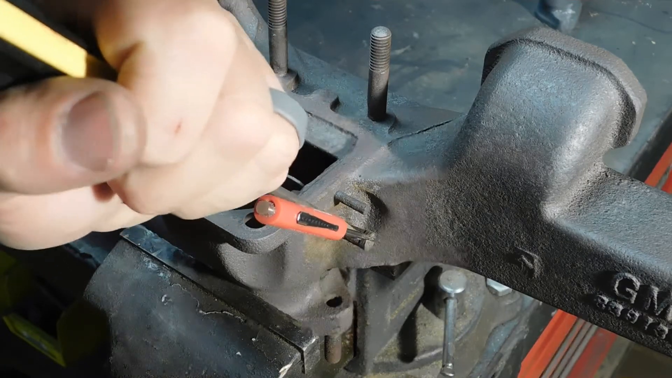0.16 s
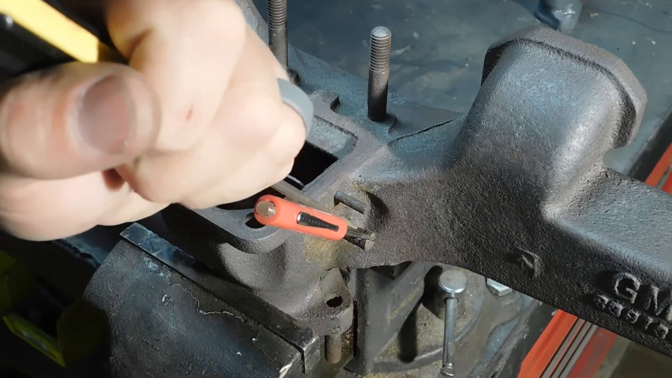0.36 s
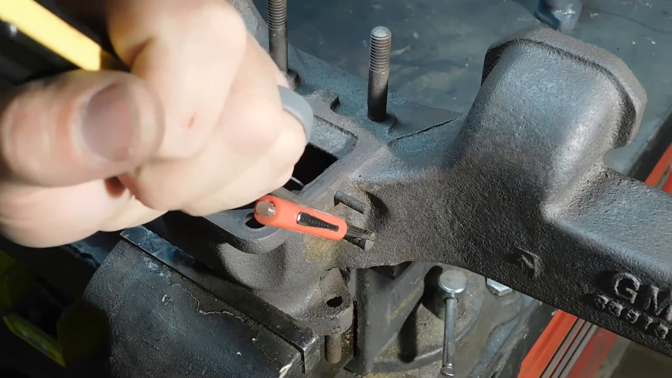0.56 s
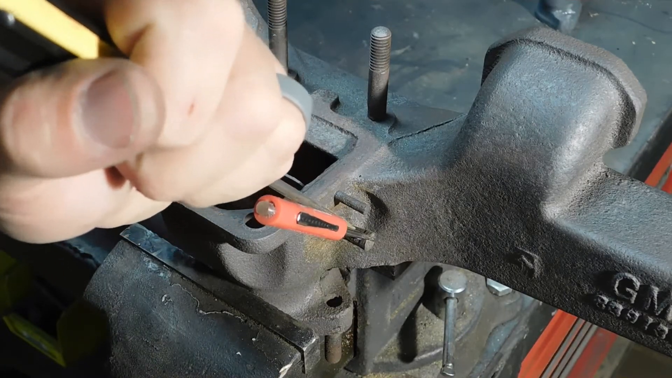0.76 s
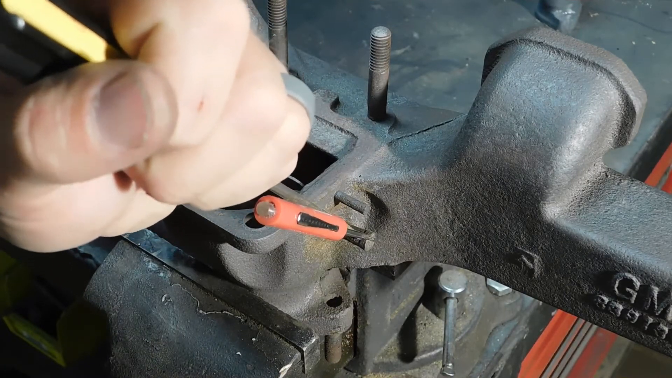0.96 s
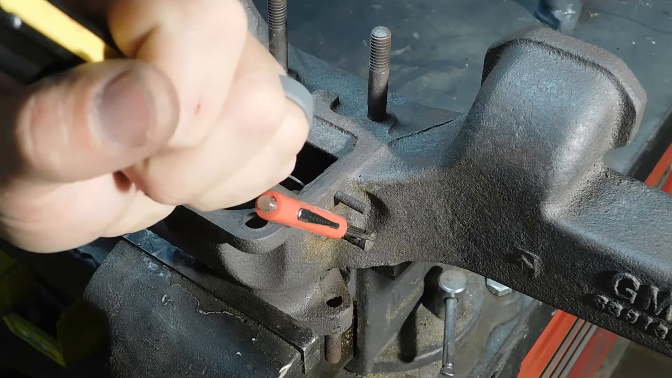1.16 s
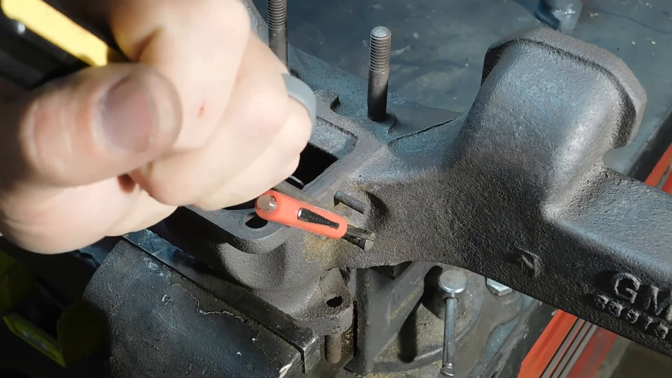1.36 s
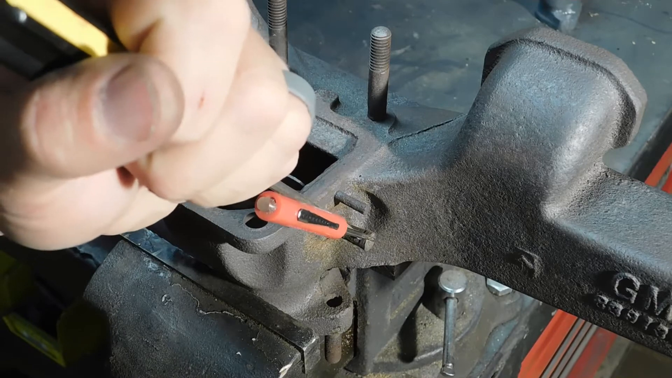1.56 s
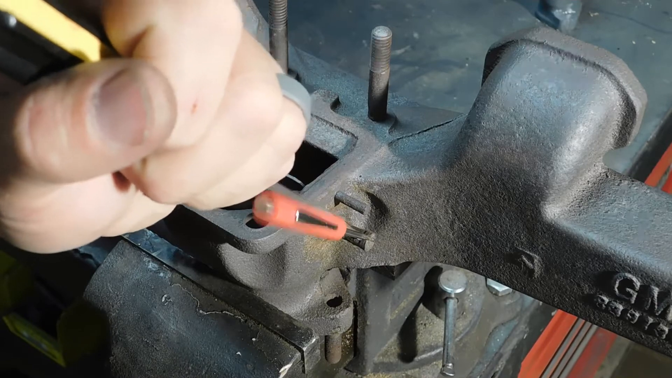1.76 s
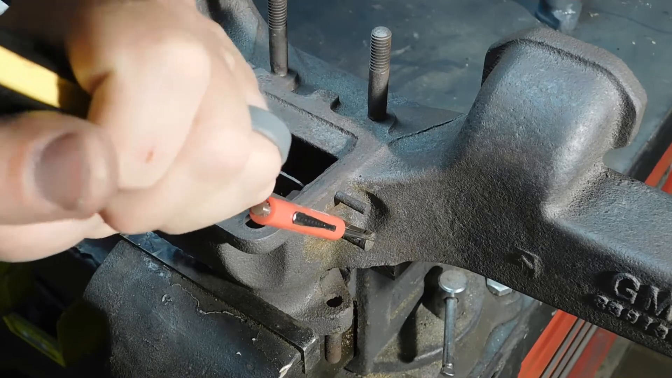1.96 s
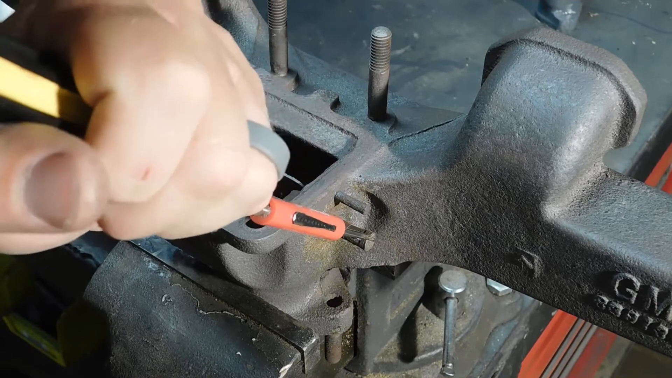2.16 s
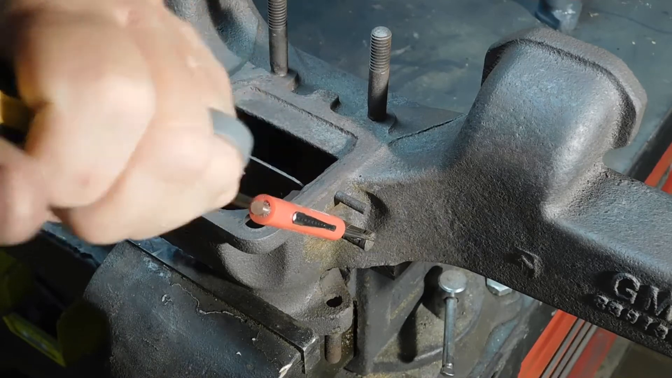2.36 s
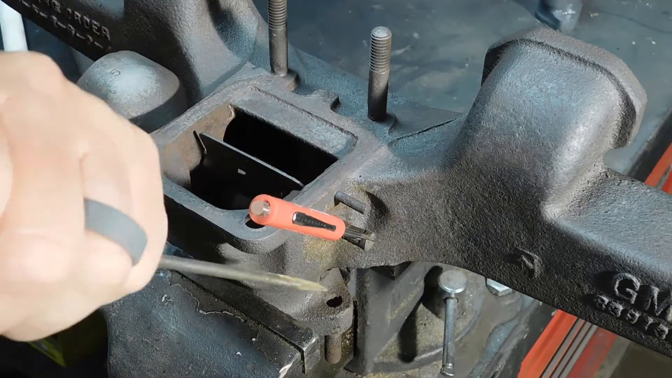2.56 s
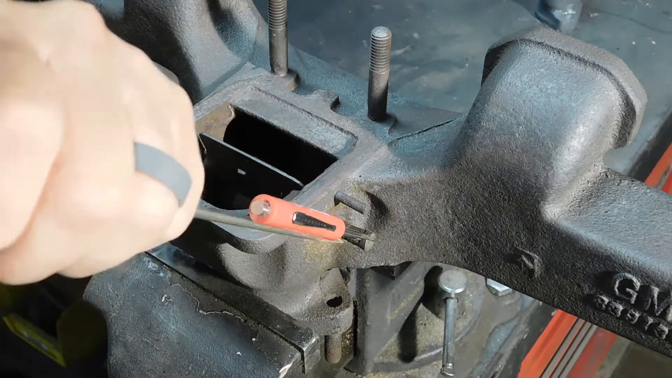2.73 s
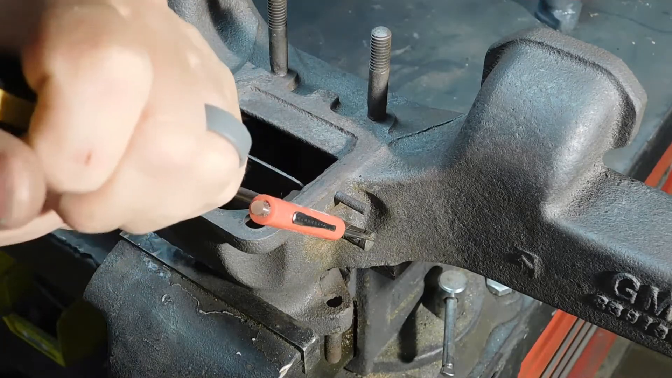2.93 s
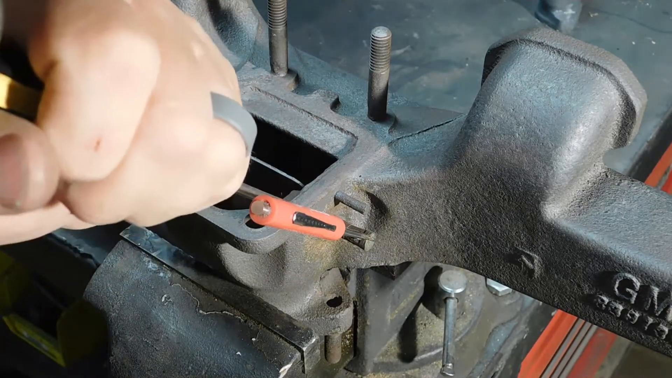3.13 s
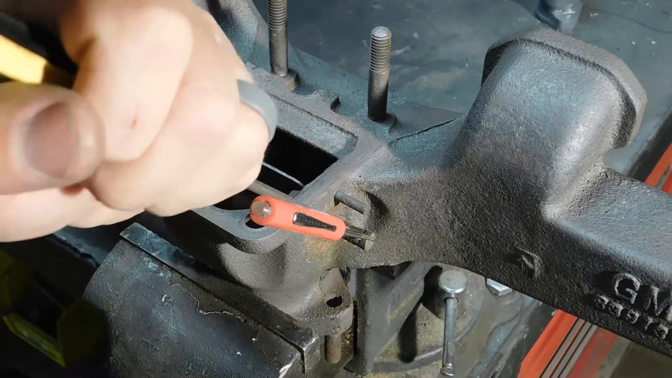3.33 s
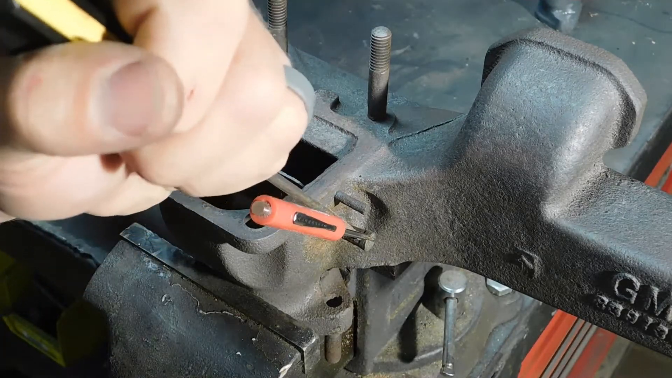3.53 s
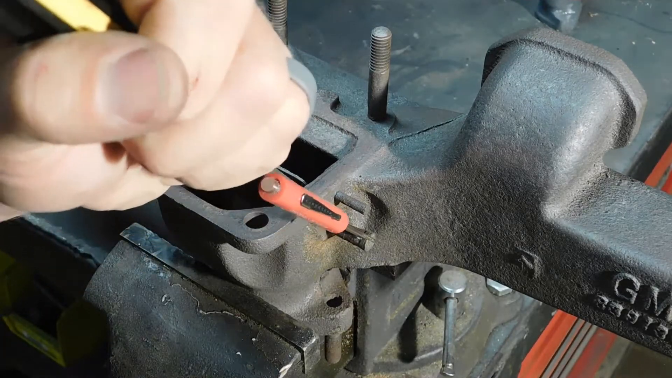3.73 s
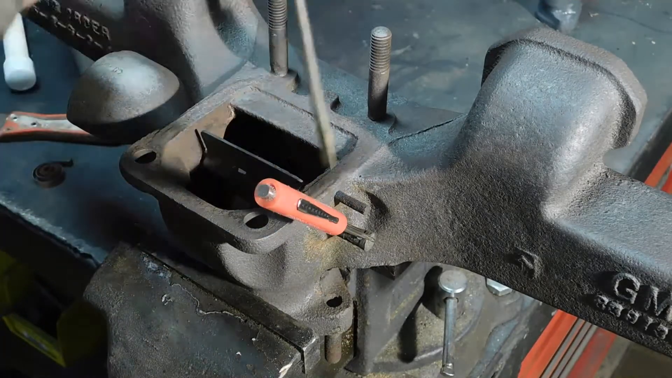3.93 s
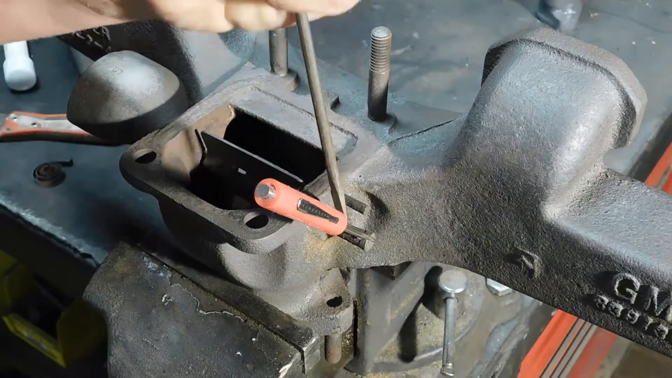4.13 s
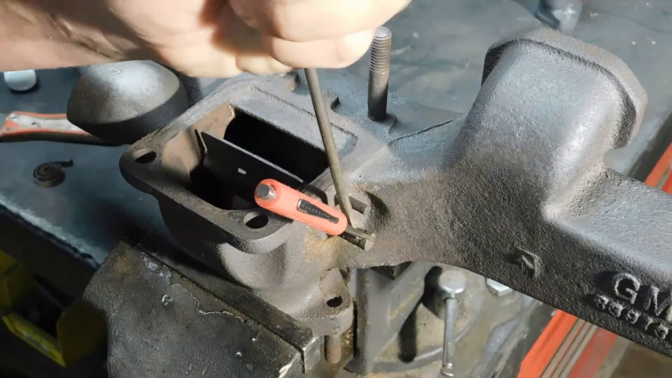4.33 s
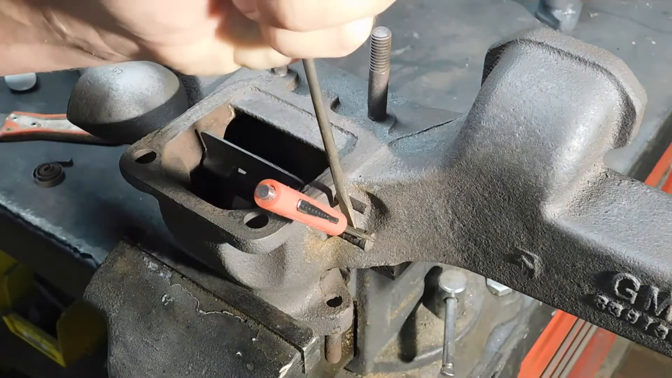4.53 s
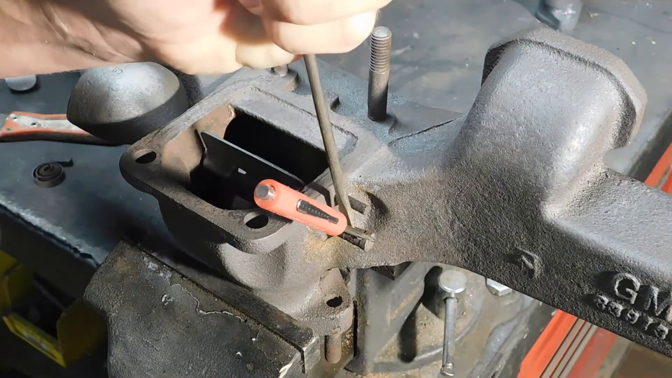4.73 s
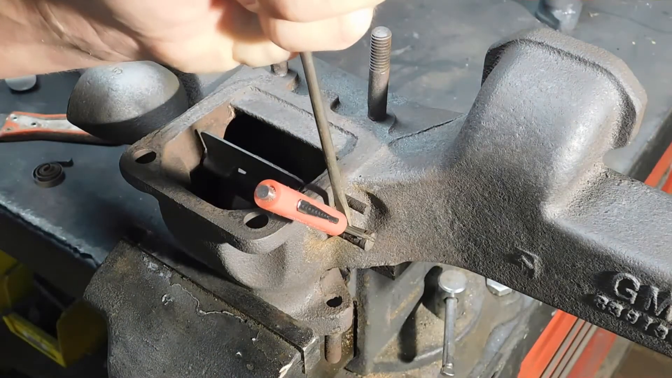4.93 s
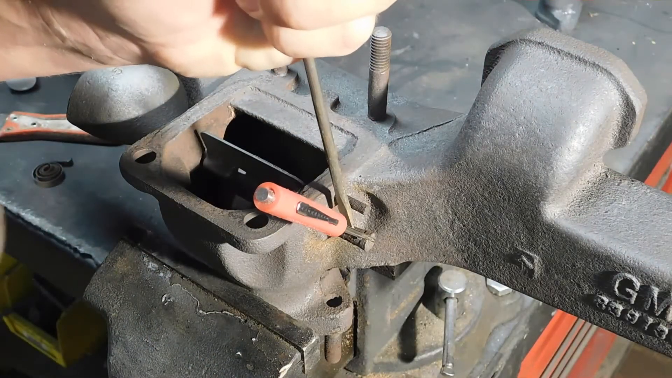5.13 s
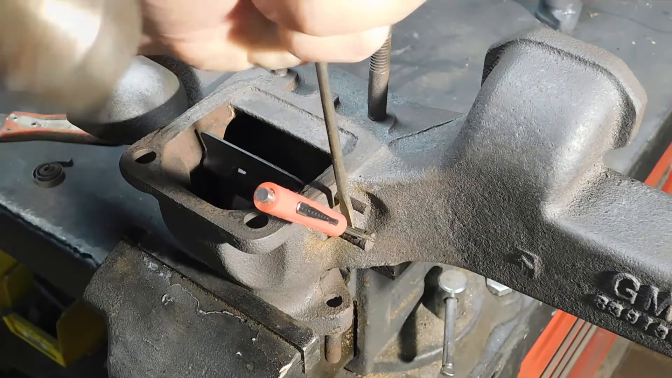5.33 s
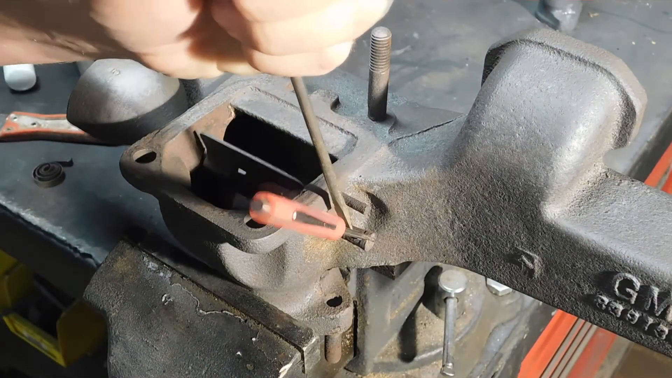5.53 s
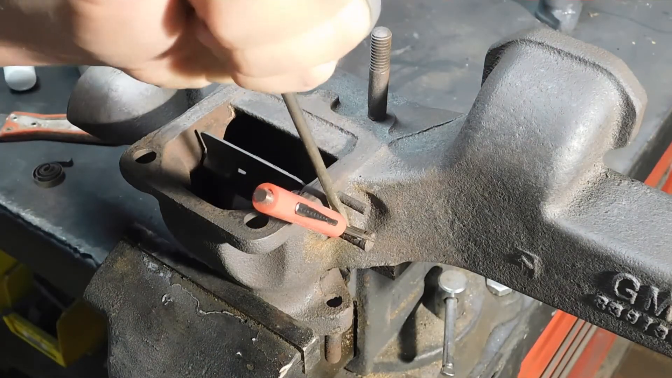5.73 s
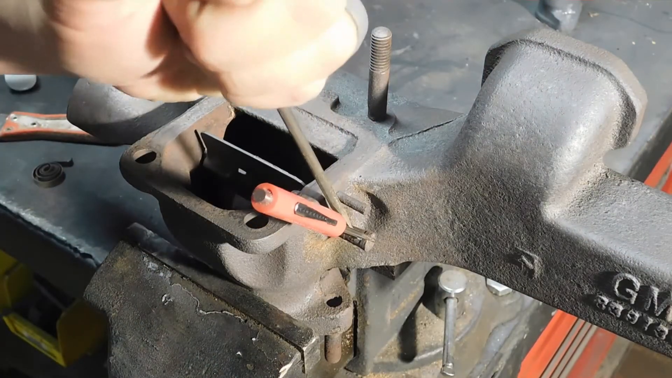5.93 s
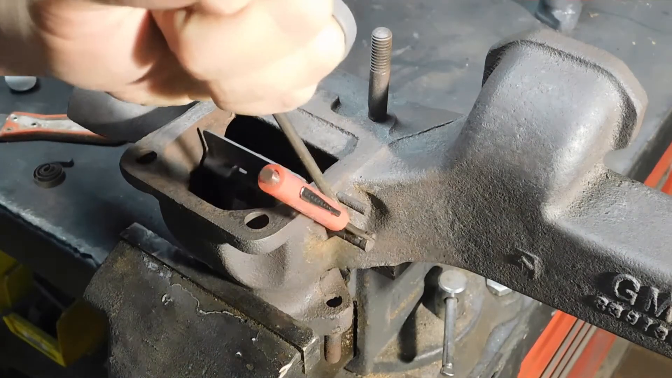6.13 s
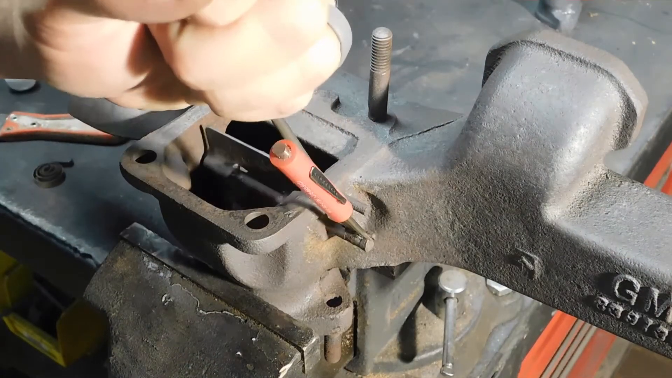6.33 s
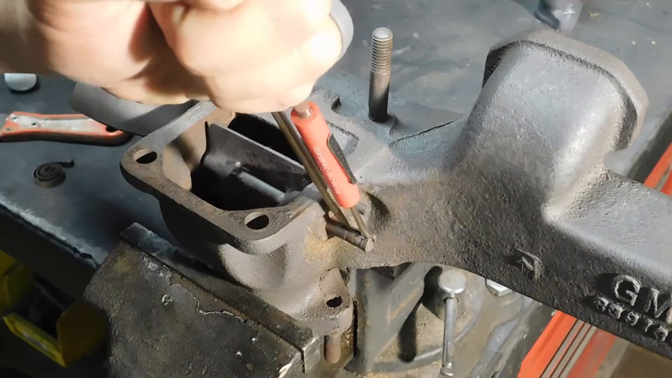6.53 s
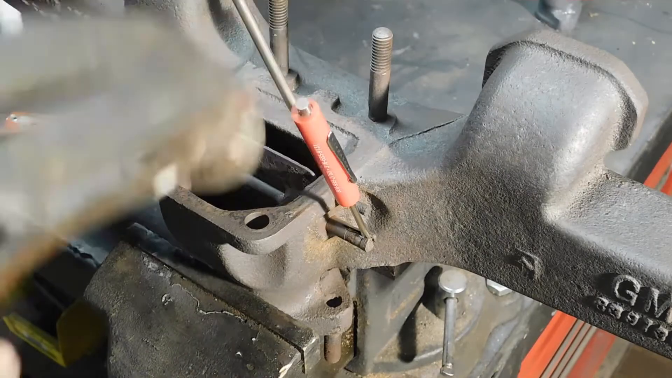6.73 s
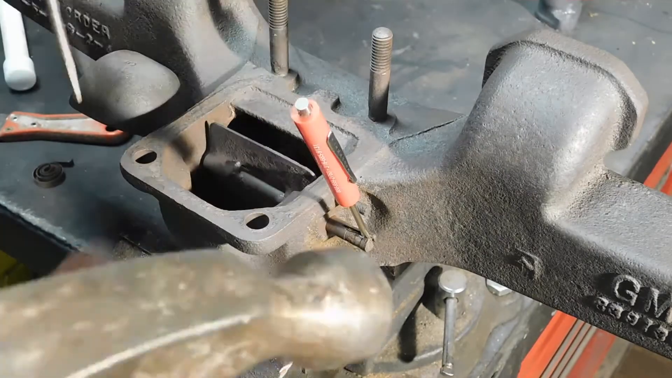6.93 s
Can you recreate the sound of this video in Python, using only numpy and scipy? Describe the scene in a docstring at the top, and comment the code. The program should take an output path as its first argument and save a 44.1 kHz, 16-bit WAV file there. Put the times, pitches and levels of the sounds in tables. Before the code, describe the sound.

Metal tapped and hammered in a hard-walled workshop: four spaced clanks, faint knocks between, then a rapid burst of clattering hits over faint hush.

```python
"""A ringing blow on iron comes first, over a steady hush, in a hard-walled workshop.
A screwdriver is tapped and levered against an iron casting in a vise. Small blade ticks and dull knocks
fall between the blows; a glove rustles at the end. Each strike is a burst of noise driving decaying
modes, broad clatter and a bench thud, answered by a room of decaying noise bands. The hush is coloured
noise with narrow-band tones. Two spaced microphones hear it with little in common."""
import sys
import numpy as np
from scipy import signal
from scipy.fft import rfft, irfft
from scipy.io import wavfile
from scipy.ndimage import uniform_filter1d

SR = 44100
rng = np.random.default_rng(int(sys.argv[2]) if len(sys.argv) > 2 else 0)


def generate_wav(sig):
    """Save sig (samples, or channels by samples) to the path in sys.argv[1] as 16-bit PCM at SR."""
    pcm = np.round(np.clip(np.atleast_2d(sig).T, -1, 1) * 32767).astype(np.int16)
    wavfile.write(sys.argv[1], SR, pcm)


N = 307818
SPAN = 2 ** 15  # samples worked out for each strike and for the room
HZ = np.maximum(np.arange(SPAN // 2 + 1) * SR / SPAN, 1)  # pitch of each spectrum bin


def from_db(db):
    """Decibels to gain."""
    return 10 ** (np.asarray(db) / 20)


def rms_one(x):
    """Scales to rms 1, both sides together."""
    return x / np.sqrt(np.mean(x ** 2) + 1e-20)


def peak_one(spectrum):
    """Scales each side so that its loudest 6 ms have rms 1."""
    power = uniform_filter1d(irfft(spectrum) ** 2, size=256)
    return spectrum / np.sqrt(np.max(power, axis=1, keepdims=True))


def in_time(rows):
    """A curve read at every sample."""
    return np.interp(np.arange(N) / SR, *np.transpose(rows))


def at_hz(points, hz):
    """A spectrum read on a log-frequency axis."""
    points_hz, values = np.transpose(points)
    return np.interp(np.log(hz), np.log(points_hz), values)


def coloured_noise(spectrum):
    """Noise shaped to a spectrum, unrelated on the two sides; rms 1."""
    hz = np.maximum(np.arange(N // 2 + 1) * SR / N, 1)
    white = rfft(rng.standard_normal((2, N)))
    return rms_one(irfft(white * from_db(at_hz(spectrum, hz)), N))


# spectrum of the air and machine noise: pitch_hz, relative density_db (per Hz)
HUSH_COLOUR = [(20, -21), (210, -19), (310, -16), (500, -9), (1000, -8), (1500, -7), (2000, -9),
               (2500, -12), (4000, -19), (5000, -24), (6500, -24), (9000, -30), (13000, -35), (16000, -37)]
# faint wavering tones: pitch_hz, width_hz, relative level_db
WAVERING_TONES = [(1250, 60, -5), (1454, 40, 0), (1745, 55, -1.5)]
# how the tones swell and sink: time_s, level_db
TONE_LEVEL = [(0, -71), (2.3, -74), (2.55, -63.5), (2.75, -71), (3.3, -70), (3.9, -57), (4.3, -78),
              (5.4, -62.5), (5.5, -67), (6.98, -75.5)]
HUSH_DB = -61


def hush():
    """Distant air and machine noise; narrow resonances turn noise into tones that waver."""
    tones = 0
    for hz, width_hz, db in WAVERING_TONES:
        radius = np.exp(-np.pi * width_hz / SR)
        poles = [1, -2 * radius * np.cos(2 * np.pi * hz / SR), radius * radius]
        tone = signal.lfilter([1, 0, -1], poles, rng.standard_normal((2, N)))
        tones = tones + from_db(db) * rms_one(tone)
    return from_db(HUSH_DB) * coloured_noise(HUSH_COLOUR) + from_db(in_time(TONE_LEVEL)) * tones


# glove on metal, rising at the end: time_s, level_db
RUSTLE_LEVEL = [(0, -94), (6.8, -81), (6.9, -70), (6.98, -51.5)]
# spectrum of the rustle: pitch_hz, relative density_db (per Hz)
RUSTLE_COLOUR = [(120, -50), (200, -18.5), (416, 3), (1160, -18.5), (1530, -12), (2130, -3), (16000, -12.5)]


def rustle():
    """A glove rubbing metal: coloured noise that swells at the end."""
    return from_db(in_time(RUSTLE_LEVEL)) * coloured_noise(RUSTLE_COLOUR)


# how fast the echoes die: pitch_hz, t60_s
ROOM_DECAY = [(60, 0.23), (200, .3), (500, 0.4), (1200, 0.38), (2500, .36), (5000, 0.32), (9000, 0.25),
              (12000, .22), (16000, .17)]
# how strongly each band starts: pitch_hz, relative level_db
ROOM_COLOUR = [(60, -25), (200, 0.5), (600, 4.5), (1300, 8), (2400, 0.5), (4000, 0), (9000, 3.5),
               (15000, -8.5)]
ROOM_BUILD_S = 0.015
HOLD_DB, HOLD_S = 4.5, 0.023  # the echoes hold louder for about this long, then drop


def workshop():
    """Echo spectrum for each side: third-octave noise bands that build up and die at their own rate."""
    t, echoes = np.arange(SPAN) / SR, np.zeros((2, SPAN))
    white = rfft(rng.standard_normal((2, SPAN)))
    for hz in 40 * 2 ** np.arange(0, 9, 1 / 3):
        band = np.clip(1 - 3 * np.abs(np.log2(HZ / hz)), 0, 1)
        fading_db = at_hz(ROOM_COLOUR, hz) - 60 * t / at_hz(ROOM_DECAY, hz)
        echoes += irfft(white * band) * from_db(fading_db)
    hold = from_db(HOLD_DB * np.exp(-(t / HOLD_S) ** 4))
    echoes *= (1 - np.exp(-t / ROOM_BUILD_S)) * (t < .6) * hold
    return rfft(echoes / np.sqrt(np.mean(np.sum(echoes ** 2, axis=1))))


def mode(hz, t60):
    """Frequency response of a sine of height 1 that dies away."""
    r = from_db(-60 / (t60 * SR))
    w = 2 * np.pi * hz / SR
    z = np.exp(-2j * np.pi * HZ / SR)
    return np.sin(w) * z / (1 - 2 * r * np.cos(w) * z + (r * z) ** 2)


MODE_SPREAD_DB = 2  # standard deviation of each mode's strength
THUD_HZ, THUD_T60_S = 145, 0.0035
FAVOUR_DB, FAVOUR_OCTAVES = 4.5, 0.37  # the spot struck favours one pitch in the direct sound
RING_FAVOUR_DB = 5  # modes near that pitch ring more strongly, in the room too
RIGHT_LATE_S = .0008


def nearness(hz, spot_hz):
    """1 at the favoured pitch, falling away over octaves."""
    return np.exp(-(np.log2(hz / spot_hz) / FAVOUR_OCTAVES) ** 2)


def strikes(events, touch, modes, clatter, room):
    """A gritty contact burst drives the modes, the clatter and the bench; the room answers."""
    t, out = np.arange(SPAN) / SR, np.zeros((2, N + SPAN))
    rise_share, bright_db, dulling, thud_db, pan_db = touch
    hardest_db, pitches = max(row[1] for row in events), np.array(modes)[:, 0]
    rings = np.array([from_db(db) * mode(hz, t60) for hz, db, t60 in modes])
    bins = [round(hz * SPAN / SR) for hz in pitches]
    thud = mode(THUD_HZ, THUD_T60_S)
    octaves = np.log2(np.maximum(HZ, 500) / 2000)
    clatter_gain = from_db(at_hz(clatter, HZ))
    sides = from_db(pan_db / 2 * np.array([[1], [-1]]))
    for start_s, level_db, contact_ms, ring_db, room_db, spot_hz in events:
        age = 1000 * t / contact_ms
        shape = (1 - np.exp(-age / rise_share)) ** 2 * np.exp(-age)
        grit = rfft(rng.standard_normal((2, SPAN)) * shape) / np.sqrt(np.sum(shape ** 2))
        # each side faces the body from another angle, so the modes arrive with other strengths
        spread_db = MODE_SPREAD_DB * rng.standard_normal((2, len(modes)))
        strength = from_db(ring_db + RING_FAVOUR_DB * nearness(pitches, spot_hz) + spread_db)
        # even out how strongly the random burst happens to drive each mode
        strength /= np.maximum(np.abs(grit[:, bins]), .4)
        brightness = from_db((bright_db - dulling * (hardest_db - level_db)) * octaves)
        body = peak_one(grit * brightness * (strength @ rings + clatter_gain))
        body += from_db(thud_db) * peak_one(grit * thud)
        favoured = from_db(FAVOUR_DB * nearness(HZ, spot_hz))
        heard = body * (favoured + from_db(room_db) * room)
        heard[1] *= np.exp(-2j * np.pi * HZ * RIGHT_LATE_S)
        at = int(start_s * SR)
        out[:, at:at + SPAN] += from_db(level_db) * sides * irfft(heard) * (t < .7)
    return out[:, :N]


# ticks of the blade: start_s, level_db, contact_ms, ring_db, room_share_db, favoured_hz
BLADE_TICKS = [(3.002, -50.5, 0.76, -13, -9, 5530), (3.129, -59, 1.47, -9, -21, 3510),
               (4.540, -44.5, 3.1, 8.5, -9.5, 2200), (4.767, -56.5, 6.9, 2, -8, 8300),
               (5.017, -45.5, 6.7, 6.5, -17, 2200), (5.084, -44.5, 1, 5, -6, 2220),
               (5.118, -47, 4.5, -15, -17, 9200), (5.460, -39.5, 0.2, -14, -18, 7000)]
# shared touch: rise (share of contact), brightness (dB per octave, hardest strike),
# brightness lost (dB per octave for each dB below the hardest), thud_db, left_over_right_db
TICK_TOUCH = (0.1, 1, -0.03, -55, 1.5)
# modes of the blade: pitch_hz, relative level_db, t60_s
BLADE_MODES = [(2100, -5, .07), (2600, -11, .03), (3300, -8, .04), (6200, -21, .02), (8300, -18, .03),
               (9300, -22, .025)]
# clatter of the blade: pitch_hz, relative level_db
BLADE_CLATTER = [(30, -10), (1200, -17), (2000, 42), (4000, 33.5), (8000, 19), (16000, 17)]


def blade_ticks(room):
    """Small ticks: contact bursts ring the short modes of the screwdriver blade."""
    return strikes(BLADE_TICKS, TICK_TOUCH, BLADE_MODES, BLADE_CLATTER, room)


# dull knocks on the vise: start_s, level_db, contact_ms, ring_db, room_share_db, favoured_hz
VISE_KNOCKS = [(0.268, -63, 6.3, 4.5, -19, 497), (0.506, -47.5, 9.5, 2, -5.5, 1220),
               (0.689, -42, 17, 1.5, -10.5, 1430), (0.886, -49, 17, 6, -12, 990),
               (0.912, -54, 6.3, -8.5, -12.5, 2000), (1.408, -44, 6.5, -6.5, -11, 1490),
               (1.682, -30, 9.6, 9, -7.5, 1210), (3.008, -54.5, 8.6, 3, -7, 502),
               (3.516, -27.5, 6.4, 5.5, -10.5, 2444), (4.326, -53, 8.5, 2, -4, 1000),
               (4.833, -49, 8.4, 0, -10.5, 968), (5.125, -47.5, 6, 6.5, -7, 690)]
# shared touch, columns as for the ticks
KNOCK_TOUCH = (0.12, 4.5, .25, -40.5, -0.1)
# modes of the vise: pitch_hz, relative level_db, t60_s
VISE_MODES = [(480, -6, .08), (640, -3, .1), (965, -4, .1), (1085, -1, .1), (1420, -6, .07), (1770, 1, .08),
              (2050, -7, .07), (2466, -5, .06), (3240, -11, .05)]
# clatter of the vise: pitch_hz, relative level_db
VISE_CLATTER = [(200, 5), (450, 6.7), (1000, 45), (2000, 48), (3400, 39.5), (5000, 27.8), (9000, 19),
                (16000, 8.5)]


def vise_knocks(room):
    """Dull knocks: contact bursts drive the lower modes of the vise."""
    return strikes(VISE_KNOCKS, KNOCK_TOUCH, VISE_MODES, VISE_CLATTER, room)


# blows on the casting: start_s, level_db, contact_ms, ring_db, room_share_db, favoured_hz
CASTING_BLOWS = [(0.055, -8.5, 4.7, -3, -5.5, 2140), (1.136, -9.5, 6.5, -0.5, -6.5, 2120),
                 (1.813, -8.5, 7.1, -3.5, -3.5, 2180), (3.683, -8, 3.8, 0, -6.5, 3060),
                 (5.589, -20.5, 8.5, -1, 4, 680), (5.733, -5.5, 3.8, -1.5, -6, 2200),
                 (5.879, -14, 9, -4, -0.95, 1100), (6.008, -16, 18.5, -10, 1.3, 1220),
                 (6.137, -11.5, 14.3, -14, -1.1, 3250), (6.277, -11.5, 6.9, -10.5, 1.8, 2170),
                 (6.427, -17.5, 27, -11.5, -0.5, 1440), (6.560, -10.5, 12.4, -13.5, -2.5, 2450)]
# shared touch, columns as for the ticks
BLOW_TOUCH = (0.0237, 1.61, 0.0775, -17, .1)
# modes of the casting: pitch_hz, relative level_db, t60_s
CASTING_MODES = [(607, -5, .14), (960, -8, .1), (1077, -5, .14), (1410, -8, .07), (1740, -8, .07),
                 (2052, 2, .14), (2392, -4, .1), (2640, -6, .06), (2870, -5, .06), (3243, 0, .11),
                 (3710, -12, .08), (4224, -9, .09), (4736, -8, .08), (5141, -11, .08), (6420, -14, .06),
                 (6878, -12, .08), (7531, -15, .06)]
# dense clatter of the many close modes: pitch_hz, relative level_db
CASTING_CLATTER = [(150, 2), (350, 35), (700, 39.5), (1400, 38), (2200, 44.5), (3300, 42.5), (4500, 38),
                   (7000, 34), (10000, 27.5), (14000, 27), (16000, 25)]


def casting_blows(room):
    """Hard blows: fast-rising contact bursts ring the iron casting, with a thud from the bench."""
    return strikes(CASTING_BLOWS, BLOW_TOUCH, CASTING_MODES, CASTING_CLATTER, room)


def scene():
    """Three kinds of strike in one room, over the hush and the rustle."""
    room = workshop()
    background = hush() + rustle()
    metal = blade_ticks(room) + vise_knocks(room) + casting_blows(room)
    return background + metal


def record(dry):
    """The hardest peaks overload softly; the top is cut."""
    overloaded = np.tanh(dry / 0.63)
    # 60 dB down from 16400 Hz upward
    low_pass = signal.cheby2(12, 60, 16400, fs=SR, output="sos")
    return np.clip(signal.sosfilt(low_pass, overloaded), -1, 1)


dry = scene()
out = record(dry)
generate_wav(out)
```